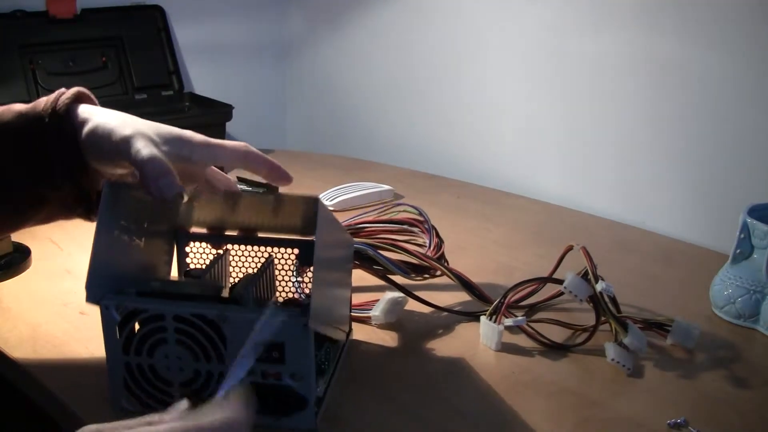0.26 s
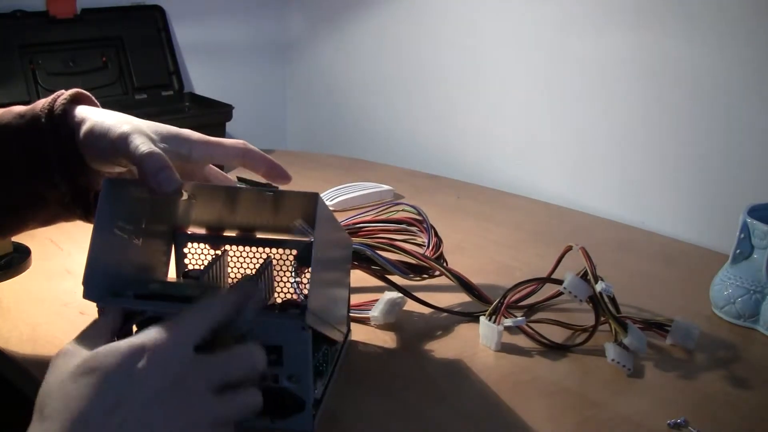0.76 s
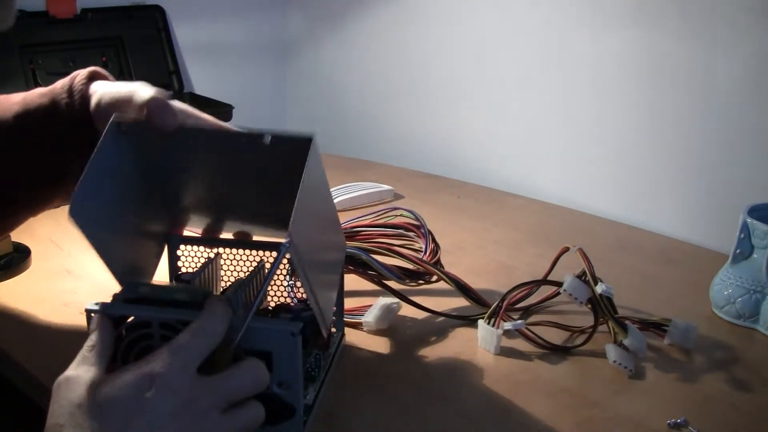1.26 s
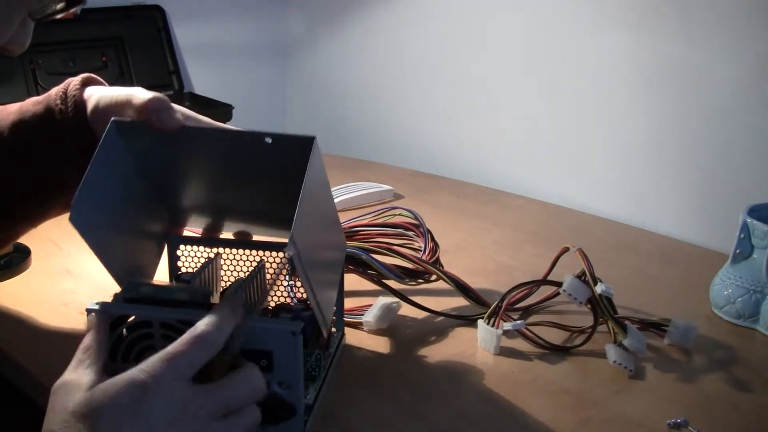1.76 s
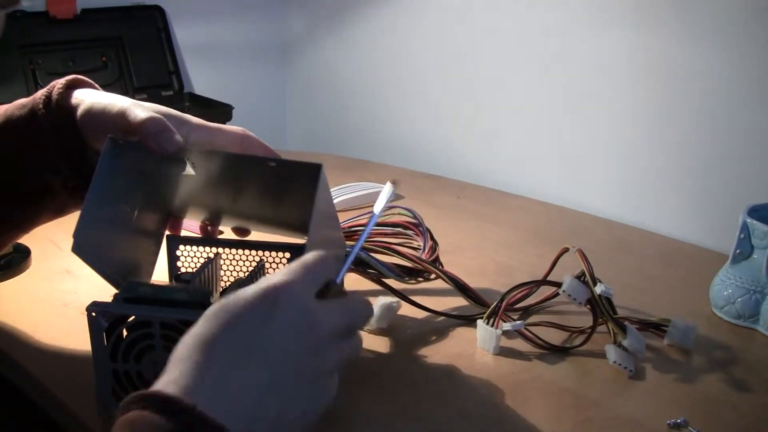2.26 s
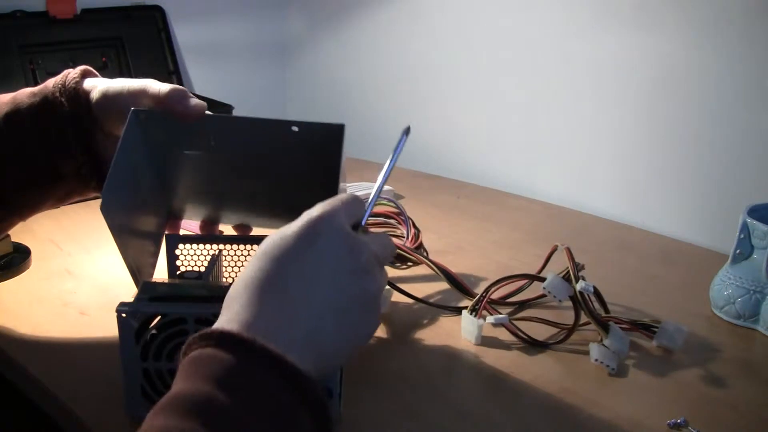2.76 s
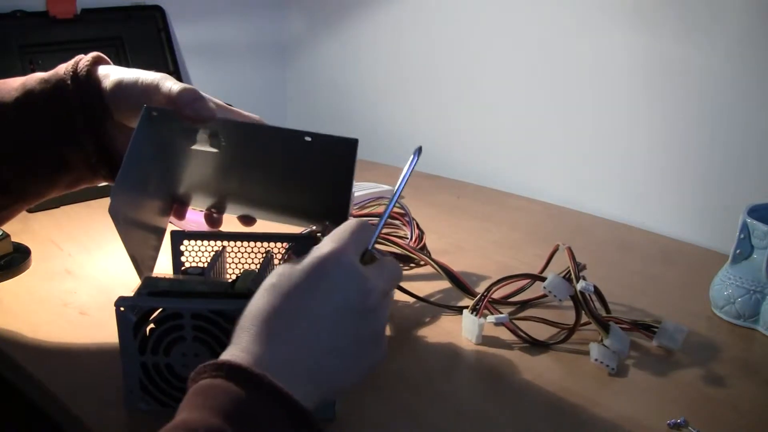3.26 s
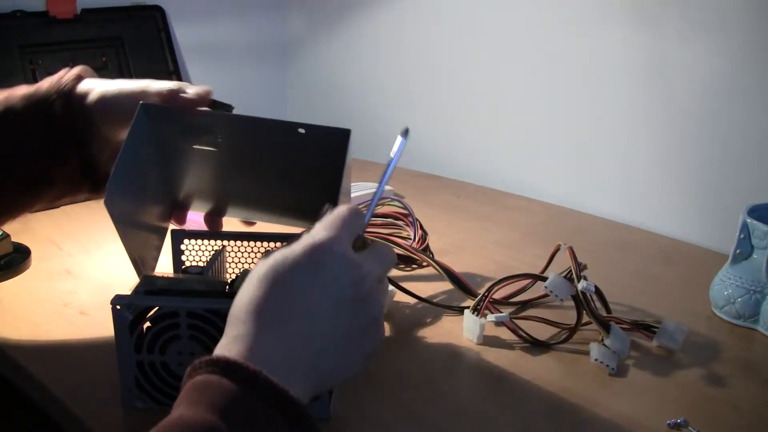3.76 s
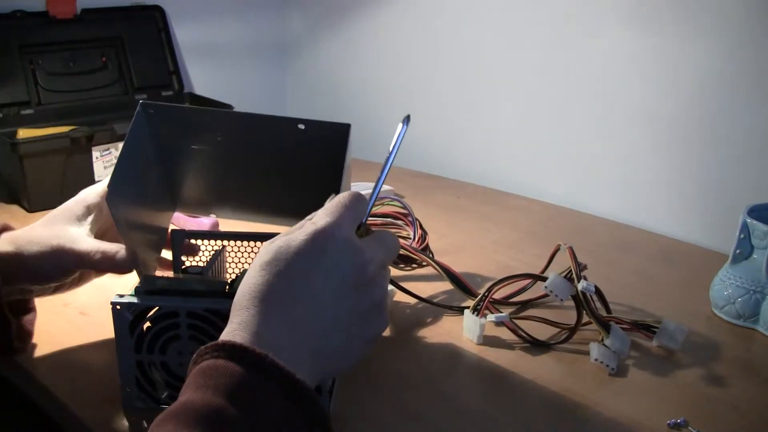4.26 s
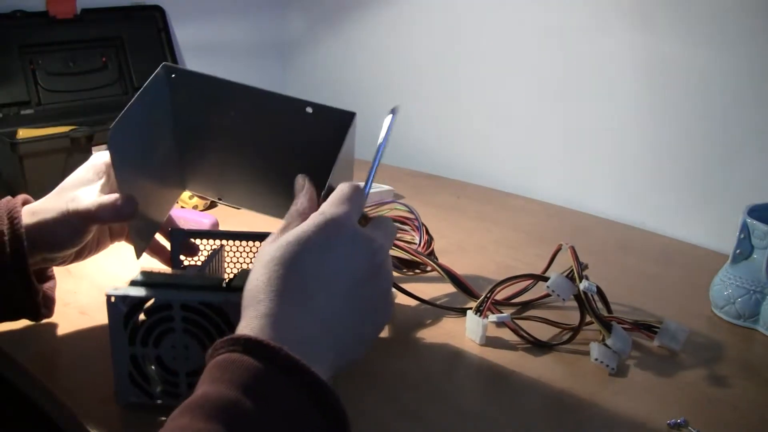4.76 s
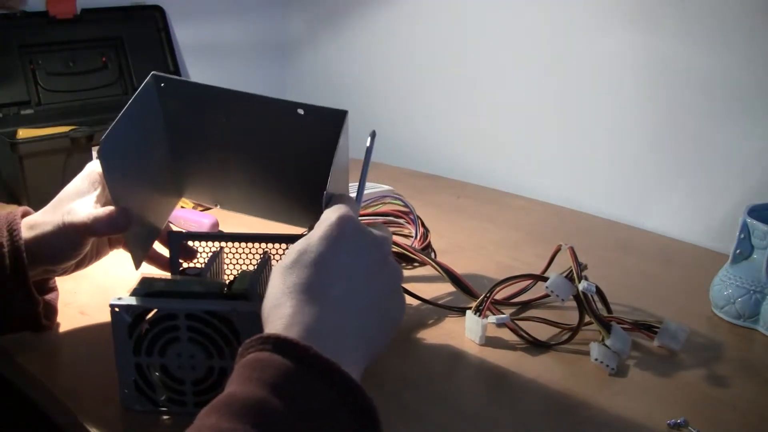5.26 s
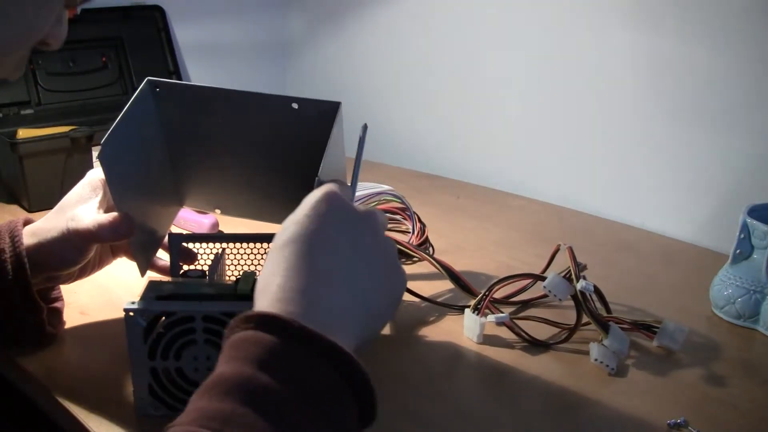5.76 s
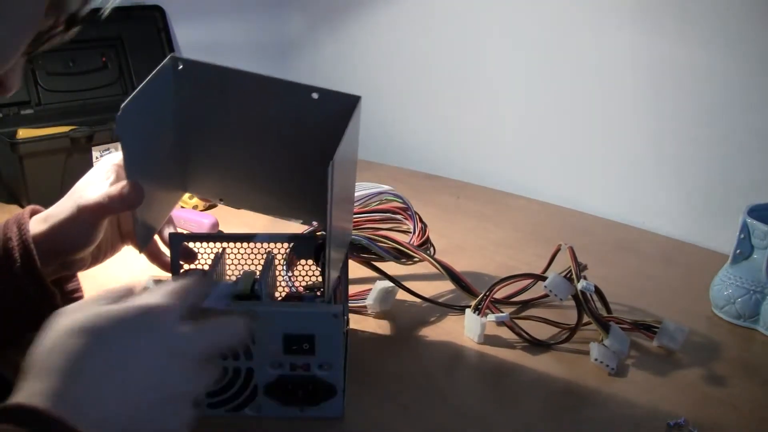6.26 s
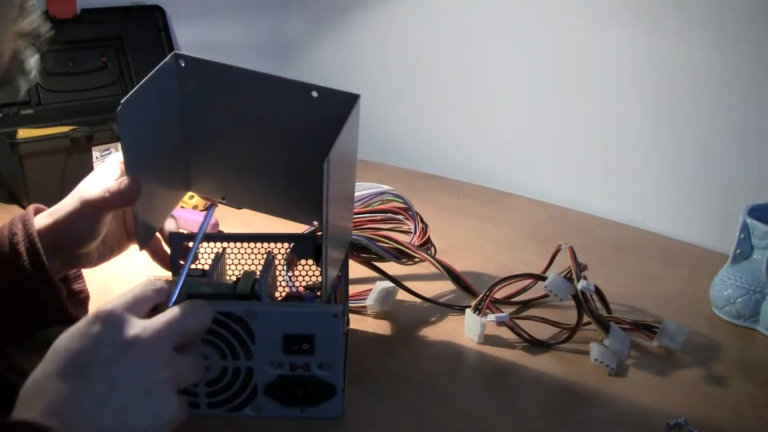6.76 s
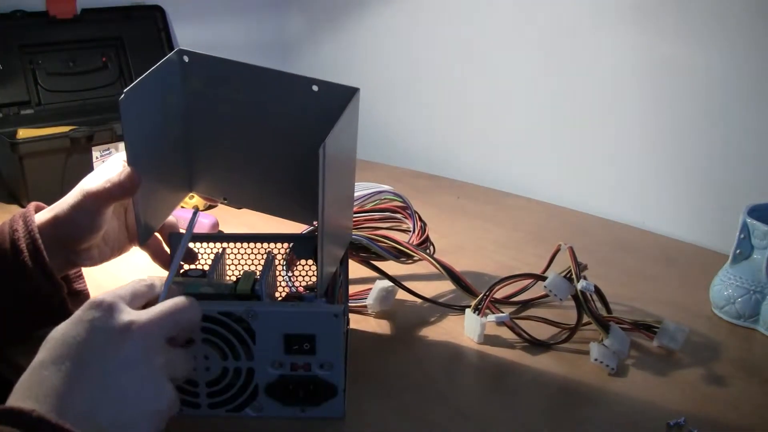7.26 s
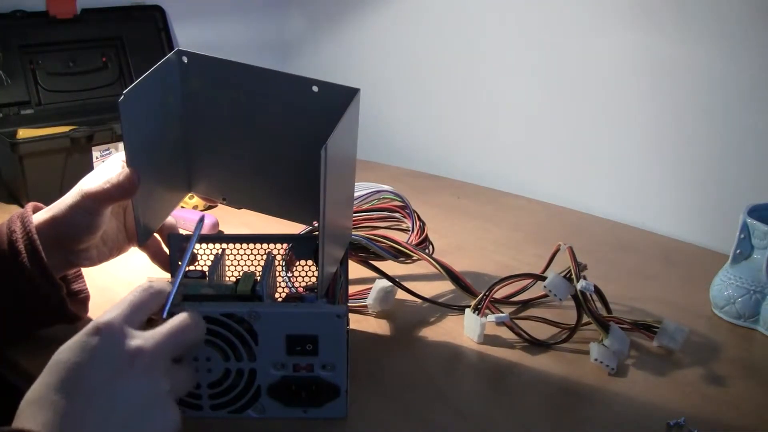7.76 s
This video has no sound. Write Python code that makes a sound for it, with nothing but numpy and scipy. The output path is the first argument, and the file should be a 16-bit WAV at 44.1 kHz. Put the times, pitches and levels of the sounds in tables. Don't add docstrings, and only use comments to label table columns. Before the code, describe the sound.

Close stereo pickup in a small room with soft, steady hum and hiss. At 0 s a steel knock and harsh scrape are already sounding; from 0.2 to 0.5 s a screwdriver grates under a thin cover with small clanks, and a clear ringing knock lands near 0.57. A scrape swells into a double clank at 0.96, followed by loud bright hits at 1.12, 1.22 and 1.26, weakening to 1.65. Light handling resumes at 2.2, with a sharp click at 2.41, hollow finger thuds around 2.7 and faint high squeaks, one clearer at 3.57. Small clicks and rubs continue around 3.8 and 4.5. A hard snap comes at 5.1, then minor shifting knocks. A brief squeak at 6.02 precedes a strong tap at 6.21; the loudest, brightest blow rings at 6.93 and dies quickly. Mostly room tone remains until a soft rub and low squeak from 7.9.

```python
import sys
import numpy as np
from scipy import signal
from scipy.fft import rfft, irfft, next_fast_len
from scipy.io import wavfile
from scipy.ndimage import map_coordinates

SR = 44100
rng = np.random.default_rng(int(sys.argv[2]) if len(sys.argv) > 2 else 0)


def to_wav(s):
    ch = np.atleast_2d(s).T
    pcm = np.round(np.clip(ch, -1, 1) * 32767)
    wavfile.write(sys.argv[1], SR, pcm.astype(np.int16))


def ratio_of_db(decibels):
    return 10 ** (np.asarray(decibels, float) / 20)


N = 352800

# (low edge [Hz], high edge [Hz])
BANDS_HZ = [(150, 700), (700, 2000), (2000, 6500), (6500, 16300)]


def unit(x):
    return x / np.sqrt(np.mean(x ** 2) + 1e-20)


def along(points, hz):
    point_hz, value = np.transpose(points)
    return np.interp(np.log(hz + 1), np.log(point_hz + 1), value)


def wobble(rate_hz, size=N):
    knots = rng.standard_normal(int(size * rate_hz / SR) + 4)
    return map_coordinates(knots, [np.arange(size) * rate_hz / SR])


def filtered(x, response):
    m = next_fast_len(x.shape[-1] + SR // 2)
    spectrum = rfft(x, m) * response(np.fft.rfftfreq(m, 1 / SR))
    return irfft(spectrum, m)[..., :x.shape[-1]]


def band(x, edges_hz):
    return signal.sosfilt(signal.butter(3, edges_hz, "bandpass", fs=SR, output="sos"), x)


def resonances(peaks, hz, depth):
    total = 0
    for k, (center, width, db) in enumerate(peaks):
        peak = 1j * hz * width / (center * center - hz * hz + 1j * hz * width)
        total = total + (-1) ** k * ratio_of_db(depth * db) * peak
    return total


def hum():
    # (frequency [Hz], density [dB per Hz])
    spectrum_db = [(12, -26), (20, -21.5), (65, -21), (89, -10), (131, -11), (179, -2.5), (257, 1.5),
                   (478, 2.5), (911, -2), (1280, -5), (1890, -10.5), (10800, -31), (15100, -35.5),
                   (16400, -52.5)]
    # (frequency [Hz], correlation [-1 to 1])
    likeness = [(60, 1), (180, -0.26), (550, -0.8), (1650, -0.12), (4970, 0.086), (15000, -0.027)]

    def response(hz):
        turn_rad = np.arccos(np.clip(along(likeness, hz), -1, 1)) / 2
        return ratio_of_db(along(spectrum_db, hz)) * [np.cos(turn_rad), np.sin(turn_rad)]

    mid, side = filtered(rng.standard_normal((2, N)), response)
    return ratio_of_db(-53 + 0.25 * wobble(2.3)) * unit(np.array([mid + side, mid - side]))


def room(x):
    # (frequency [Hz], t60 [s])
    decay_s = [(200, 0.55), (1000, .35), (4000, 0.28), (12000, 0.21)]
    # (frequency [Hz], level [dB])
    side_db = [(150, -15), (500, -10.5), (1500, -15), (4000, -11), (12000, 2.5)]
    out, step, delay = np.zeros((2, N + 2 * SR)), SR // 3, 150
    for start in range(0, N, step):
        hz, t, z = signal.stft(rng.standard_normal((2, SR // 2)), SR, nperseg=256)
        fade = ratio_of_db(-60 * t / along(decay_s, hz)[:, None])
        tail = signal.istft(z * fade, SR, nperseg=256)[1]
        answer = signal.fftconvolve(x[None, start:start + step], tail / np.linalg.norm(tail[0]), axes=1)
        out[:, start + delay:][:, :answer.shape[1]] += answer
    mid, side = out[:, :N]
    side = filtered(side, lambda hz: ratio_of_db(along(side_db, hz)))
    return np.array([mid + side, mid - side])


def microphones(steel):
    # (frequency [Hz], left-right level [dB])
    lean_db = [(60, 7), (150, 1), (380, -1.5), (950, -1.0), (2380, 0), (5980, -2.5), (15000, 4)]
    # (frequency [Hz], phase by which left leads [rad])
    lead_rad = [(0, 0), (6630, 0.2), (7150, 0), (7750, 1.2), (9990, 0), (11900, 0.31), (14100, 0.72),
                (16200, 9)]

    def ports(hz):
        left = ratio_of_db(along(lean_db, hz) / 2) * np.exp(1j * along(lead_rad, hz) / 2)
        return np.array([left, 1 / left])

    return filtered(steel, ports)


def squeaks():
    # (time [s], length [s], frequency [Hz], width [Hz], level [dB])
    bowings = [(2.498, .07, 13500, 60, -72), (2.76, .05, 13450, 60, -70), (2.95, 0.08, 11820, 60, -76),
               (3.573, 0.11, 13200, 50, -63), (3.572, 0.11, 3250, 1505, -60.5),
               (5.45, .07, 11800, 59.7, -78), (6.02, 0.045, 1950, 150, -58),
               (7.915, 0.136, 1340, 100, -53.5), (7.916, 0.091, 2550, 500, -56.5)]
    out, t = np.zeros(N + SR), np.arange(SR // 4) / SR
    for s, length_s, hz, width_hz, db in bowings:
        drift = wobble(width_hz, size=len(t)) + 1j * wobble(width_hz, size=len(t))
        bowed = (drift * np.exp(2j * np.pi * hz * t)).real
        swell = np.sin(np.pi * np.clip(t / length_s, 0, 1))
        out[round(s * SR):][:len(t)] += ratio_of_db(db) * swell * bowed
    return out[:N]


def rubbing(strokes, peaks, broad, depth):
    grit = rng.standard_normal(N) * ratio_of_db(2.5 * wobble(30) + 3 * wobble(400))
    sound = filtered(grit, lambda hz: broad + resonances(peaks, hz, depth))
    bands = [unit(band(sound, edges)) for edges in BANDS_HZ]
    out, t = np.zeros(N), np.arange(N) / SR
    for rows in strokes:
        s, *levels_db = np.transpose(rows)
        touch = np.clip(np.minimum(t - s[0], s[-1] + .02 - t) / .02, 0, 1)
        for db, part in zip(levels_db, bands):
            out += touch * ratio_of_db(np.interp(t, s, db) - 7.5) * part
    return out


def hand_rubs():
    # (time [s], thud [dB], clank [dB], scratch [dB], fizz [dB])
    crash = [(0.0, -30, -36, -23.5, -33), (0.056, -56, -39, -37.5, -42), (0.07, -52, -39.5, -42, -49),
             (0.146, -62, -54, -59, -65), (0.16, -61, -54, -57, -70)]
    handling = [(1.3, -51.5, -49, -51, -70.5), (1.35, -52, -60, -73, -80), (1.42, -53, -67, -71.5, -72),
                (1.57, -57, -96, -62, -63), (1.77, -58, -69, -68, -71), (2.1, -57, -60, -65.5, -67),
                (2.33, -55, -53, -63.5, -63), (2.45, -50.5, -46.5, -62, -62),
                (2.57, -43.5, -42.5, -51.5, -61), (2.64, -49, -42.5, -52.5, -58),
                (2.72, -62, -53, -63, -65), (2.79, -47, -80.5, -65, -70), (2.89, -74, -81, -64.5, -70),
                (3.12, -49, -52.5, -63, -72), (3.31, -51.5, -62, -84.5, -74.5), (3.45, -55, -68, -73, -83),
                (3.64, -55.5, -53, -65, -63), (3.8, -50, -51.5, -55, -61), (3.93, -51, -54, -63, -65),
                (4.04, -61, -62, -69, -76), (4.28, -66, -70, -88, -82.5), (4.46, -51, -48.5, -62, -60.5),
                (4.6, -54, -54, -57.5, -59), (4.77, -55, -67, -63.5, -66.5), (4.93, -76, -57, -60, -61.5),
                (5.12, -48, -73, -77, -75), (5.3, -57, -50, -74.5, -69), (5.47, -57, -63, -72, -76),
                (5.6, -53.5, -70, -83, -79.5), (5.84, -53, -56.5, -80, -72.5),
                (6.15, -69.5, -60, -66.5, -74)]
    late = [
        [(6.62, -75, -75.5, -69, -84), (6.648, -53.5, -76, -78, -79.5), (6.696, -66, -61, -54.5, -56.5),
         (6.78, -69, -81, -68.5, -75.5)],
        [(7.88, -63, -68, -84, -79), (7.908, -58, -73, -73, -93), (7.942, -51, -45.5, -56.5, -84),
         (8.0, -46.5, -49.5, -57, -82)],
    ]
    # (frequency [Hz], width [Hz], level [dB])
    sheet = [(764, 29, 0), (964, 38, -1), (1760, 54, -2), (2390, 28, -7), (3810, 39, -8), (10300, 31, -14),
             (10500, 76, -13), (13400, 35, -16)]
    return rubbing([crash, handling, *late], sheet, broad=.7, depth=.3)


def lever_scrapes():
    # (time [s], thud [dB], clank [dB], scratch [dB], fizz [dB])
    lever = [(0.16, -55, -52, -61, -63), (0.198, -73, -51, -48, -54), (0.224, -53, -31.5, -34, -42),
             (0.29, -36, -45, -65, -72), (0.298, -49.5, -59, -54, -52), (0.338, -53, -35, -36.5, -45),
             (0.384, -54, -54, -60, -72), (0.438, -57, -37, -48, -54), (0.52, -50, -67, -74, -77)]
    slide = [(0.84, -56, -57, -75, -76), (0.876, -53, -55.5, -67, -68), (0.898, -51, -50, -57, -55),
             (0.952, -36, -29.5, -38, -42), (0.965, -41, -27.5, -37, -43)]
    # (frequency [Hz], width [Hz], level [dB])
    sheet = [(427, 60, -6), (935, 35, 0), (1746, 35, 0), (2730, 80, -3), (3580, 110, -1), (4600, 50, 0),
             (5400, 80, -8), (6850, 80, -8)]
    return rubbing([lever, slide], sheet, broad=0.093, depth=1)


def knocks(contacts, modes, ring_db):
    dense_s = [0.27, 0.11, 0.041, 0.059]
    crack_s = [0.025, 0.00833, 0.0069, 0.036]
    out, t = np.zeros((2, N + 2 * SR)), np.arange(SR // 4) / SR
    hz, level_db, t60 = np.array(modes).T[:, :, None]
    home = np.searchsorted([hi for lo, hi in BANDS_HZ], hz)
    drives_db = np.array([[db + thud, db + clank, db, db + tick] for _, db, thud, clank, tick, _ in contacts])
    rise = 1 - np.exp(-t / np.array([[.0015], [.0012], [.0007], [.0005]]))
    for (s, *_, length), drive_db in zip(contacts, drives_db):
        noise = rng.standard_normal((4, len(t)))
        crowd = np.array([unit(band(n, edges)) for n, edges in zip(noise, BANDS_HZ)])
        fade = ratio_of_db(-60 * t / (length * np.c_[dense_s])) + 0.74 * ratio_of_db(-60 * t / np.c_[crack_s])
        blow_db = (drive_db - drives_db.max(0))[home]
        swing = ratio_of_db(ring_db + level_db + blow_db + rng.normal(0, 1, hz.shape) - 60 * t / t60)
        steps = rng.standard_normal((len(hz), len(t) // 8 + 1))
        flex = .032 * np.cumsum(steps, axis=1).repeat(8, 1)[:, :len(t)]
        ring = swing * rise[home[:, 0]] * np.sin(2 * np.pi * hz * t + flex)
        here = SR + round(s * SR)
        out[0, here:][:len(t)] += (ratio_of_db(drive_db - 6)[:, None] * rise * fade * crowd).sum(0)
        out[1, here:][:len(t)] += ring.sum(0)
    return out[:, SR:SR + N]


def held_cover():
    # (time [s], peak at 2-6 kHz [dB], thud [dB], clank [dB], tick [dB], crowd length factor [1])
    hold = [(2.2043, -51, -3, 5, -17, 0.53), (2.2472, -47.5, -2, 7, -7, 0.71),
            (2.323, -55, 6, 14, -14.5, 0.65), (2.3896, -52, 3, 8, -8, 0.65),
            (2.4123, -26, -11.5, 1.5, -5, 0.63), (2.57, -47, 1, 7, -6, 0.93),
            (2.6768, -50, 9, 13, 2.5, 0.55), (2.6951, -50.5, 22.5, 22, -20, 0.81),
            (2.7193, -56.5, 18, 23.5, -7.5, 0.42), (2.7383, -50, 18.5, 15.5, -18, 0.56),
            (2.889, -61.5, 1.5, 10, 0, 0.6), (3.2442, -63, 22, 20.5, -12.5, 0.56),
            (3.3102, -60, 1, -8, -11, 0.66), (3.358, -59.5, 24, 14.5, 0, 0.85),
            (3.382, -53.5, 17, 6, -4, 0.45), (3.4158, -55.5, 0, 4, -5.5, 0.6),
            (3.4396, -55, 11, 14, -12, 0.41), (3.4662, -63, 4, -5, 6.5, 0.31),
            (3.5544, -63, -4, -2, 2.5, 0.6), (3.6856, -53.5, 2, 21.5, -18, 0.3),
            (3.7266, -49.5, 8, 9, -17, 0.28), (3.7607, -59, -11.5, 14, -12, 0.6),
            (3.8259, -45.5, -14, 10.5, -6, 1), (3.8891, -67, -6, 8.5, -10, 0.85),
            (3.915, -42.5, -8, 6.5, -10, 0.76), (4.4193, -59.5, 13, 17, -1, 0.97),
            (4.4548, -49.5, -3, 6, -19, 1), (4.4655, -43, -25, 3, -21, 0.46),
            (4.4775, -46.5, 2.5, 4, -4, 0.76), (4.5337, -50.5, 3, 5, 4, 0.65),
            (4.57, -44.5, -20, 6, 9.5, 0.24), (4.5987, -55.5, -5, 13, -14, 0.7),
            (4.7406, -55.5, 14, 10.5, -13.5, 0.57), (4.8675, -59, 8.5, -9, -5, 1)]
    # (frequency [Hz], level [dB], t60 [s])
    gripped = [(325, -8, .12), (1733, 0, .1), (3413, -1, .09), (4603, -7, .1), (8123, -5, .05)]
    # (frequency [Hz], width [Hz], level [dB])
    edge = [(620, 980, -11), (1280, 230, 6), (3620, 430, 10), (8600, 300, 17), (11840, 1100, 4.5)]
    crowd, ring = knocks(hold, gripped, ring_db=-40)
    return ring + filtered(crowd, lambda hz: .5 + resonances(edge, hz, depth=0.82))


def case_and_cover():
    # (time [s], peak at 2-6 kHz [dB], thud [dB], clank [dB], tick [dB], crowd length factor [1])
    first = [(-.012, -32, -12, -6, 3, 2.7)]
    pry = [(0.2175, -41, 0, 0.5, -17, 2.6), (0.2688, -53, 5, 20, 7, 0.57), (0.33, -46, -17, 4.5, -22, 1.2),
           (0.3502, -49, -12, 10.5, -29, 1.01), (0.4199, -53, -13.5, 2, -17, 1.7),
           (0.5661, -29, -9.5, -2.5, -15.5, 1.63), (0.8097, -66.5, 23, 8.5, -17, 1.1)]
    catch = [(0.8959, -52, 2, 4, -9, 0.83), (0.9646, -23.5, -19, -5, -11, 1.1)]
    lift = [(0.9718, -26.5, -3, -0.5, -11, 1.67)]
    drop = [(1.1201, -18.5, -28, -12.5, -11.5, 1)]
    rattle = [(1.2193, -16.5, -14, -9.5, -11, 0.75), (1.264, -18.5, -15, -3, -16, 0.76),
              (1.3284, -31, -9, -0.5, -5, 0.7), (1.4525, -38, -13, -10, -9.5, 0.62),
              (1.5007, -50.5, -7, -17, -5, 0.55), (1.6242, -54, 5.5, -11, -14, 0.56),
              (1.647, -53, 9, 8, -20, 0.73)]
    snap = [(5.104, -22.5, -17, -4, -11.5, 0.57)]
    shift = [(5.2149, -41, -8, 5, -17.5, 0.52), (5.2435, -49, -3, 8, -19, 0.55),
             (5.2844, -57, -6, 13, -1, 0.6), (5.3409, -36.5, -2.5, 10, -26.5, 0.66),
             (5.3755, -37.5, 0.5, 11.5, -20, 0.58), (5.572, -59, 14, 12, -3, 0.6),
             (5.6894, -62, -3, 0, 2.5, 0.6), (5.799, -55, 0, 7, -4, 0.6), (5.902, -52, -2, -1, -20.5, 0.6),
             (6.1086, -61.5, -9.5, -6.5, 4, 0.6)]
    tap = [(6.2128, -17, -13.5, -3, -7.5, 1), (6.5978, -53.5, -0.5, -7, -19, 1.3)]
    blow = [(6.93, -14.5, -10, -3.5, -1, 0.95), (7.2345, -57.5, 5, -1.5, -18, 1.07)]
    # (frequency [Hz], level [dB], t60 [s])
    shut = [(490, 0, .16), (915, -9, .28), (1610, -8, .25), (2304, -9, .17), (2762, -18, .15),
            (4000, -14, .08)]
    seated = [(291, -18, .25), (581, -9, .2), (931, 0, .19), (1540, -14, .23), (1755, -6, .22),
              (2482, -24, .2), (3208, -18, .15), (4608, -18, .18), (7200, -6, .04)]
    loose = [(215, -15, .22), (425, -13, .2), (651, -20, .28), (958, 0, .12), (1545, -7, .26),
             (1771, -14, .28), (2400, -16, .1), (3198, -3, .17), (5206, -22, .12), (6900, -17, .12),
             (10060, -24, .1)]
    swinging = [(409, -8, .16), (506, -10, .25), (964, -12, .3), (1610, -1, .12), (1771, -9, .2),
                (2374, -11, .13), (3612, -1, .06), (6815, -18, .12)]
    bouncing = [(415, -5, .12), (510, -5, .15), (974, -10, .22), (1642, -10, .2), (1760, 2, .16),
                (2552, -10, .08), (3219, -8, .1), (3800, -3, .04), (5313, -14, .11), (7300, -8, .04)]
    upright = [(339, -2, .2), (506, -3, .22), (721, -5, .2), (1265, -8, .15), (1782, -4, .13),
               (2400, -6, .1), (3036, -6, .15), (3822, -7, .08)]
    leaning = [(721, -3, .16), (960, -4, .14), (1782, 0, .12), (2400, -7, .09), (3822, -1, .06),
               (4500, -9, .05)]
    wall = [(339, -9, .22), (506, -16, .28), (888, -13, .28), (1567, -16, .28), (1782, 0, .18),
            (3149, -19, .25), (3531, -16, .2), (3828, -12, .13), (5308, -10, .16), (8070, -9, .1)]
    case = [(213, -17, .22), (334, -8, .2), (506, -13, .28), (1785, -1, .17), (3122, -14, .26),
            (3235, -13, .28), (4161, -14, .13), (5340, -18, .25), (7569, -19, .17), (8172, -14, .15),
            (10000, -11, .15), (11280, 0, .09), (13460, -22, .17)]
    # (frequency [Hz], width [Hz], level [dB])
    box = [(500, 300, -8.5), (965, 89, 2.5), (1640, 430, -1.5), (3850, 600, 9), (7280, 1220, 1.5),
           (10900, 2660, 5.5)]
    hits = knocks(first, shut, ring_db=-25.5)
    hits += knocks(pry, seated, ring_db=-32.5)
    hits += knocks(catch, seated, ring_db=-48)
    hits += knocks(lift, loose, ring_db=-24)
    hits += knocks(drop, swinging, ring_db=-28)
    hits += knocks(rattle, bouncing, ring_db=-32.5)
    hits += knocks(snap, upright, ring_db=-36.5)
    hits += knocks(shift, leaning, ring_db=-39)
    hits += knocks(tap, wall, ring_db=-29)
    hits += knocks(blow, case, ring_db=-25.5)
    crowd, ring = hits
    return ring + filtered(crowd, lambda hz: .5 + resonances(box, hz, depth=0.92))


def scene():
    steel = squeaks() + hand_rubs() + lever_scrapes() + held_cover() + case_and_cover()
    steel = band(steel, (150, 14800))
    return hum() + ratio_of_db(-9.5) * room(steel) + microphones(steel)


def top_cut(x):
    return signal.sosfilt(signal.butter(12, 16580, fs=SR, output="sos"), x)


def record(dry):
    mix = filtered(dry, lambda hz: hz < 16500)
    return top_cut(mix)


dry = scene()
out = record(dry)
to_wav(out)
```